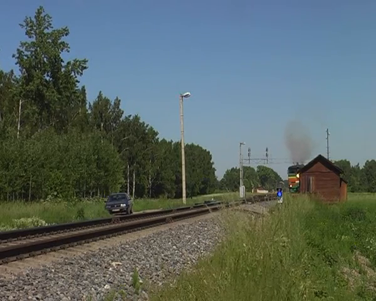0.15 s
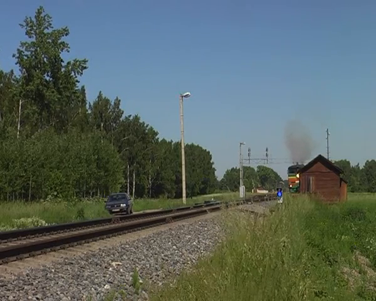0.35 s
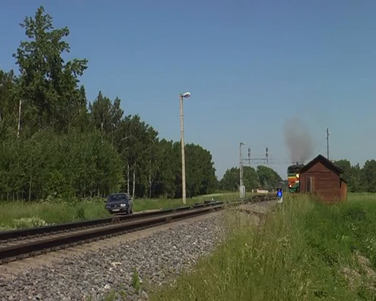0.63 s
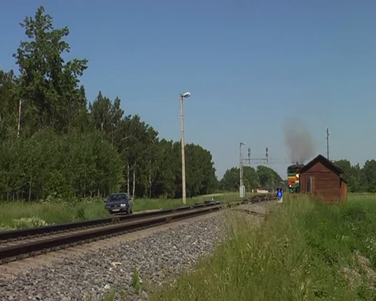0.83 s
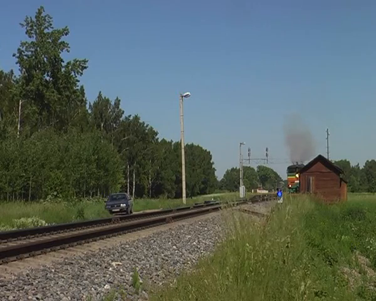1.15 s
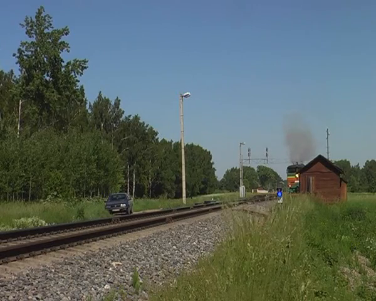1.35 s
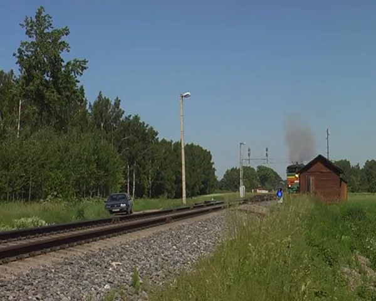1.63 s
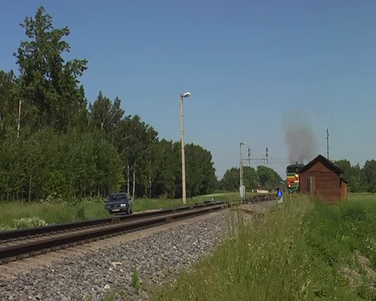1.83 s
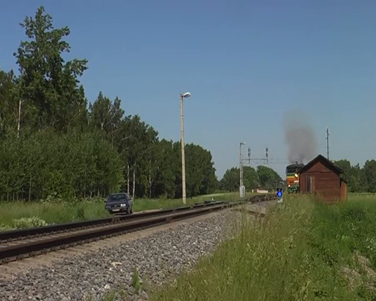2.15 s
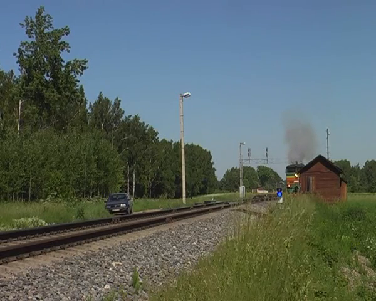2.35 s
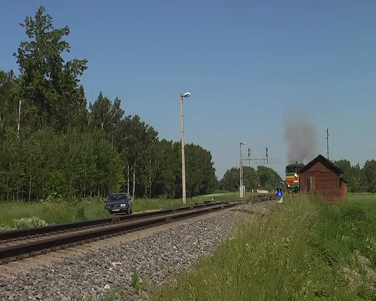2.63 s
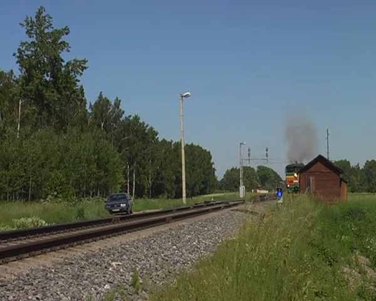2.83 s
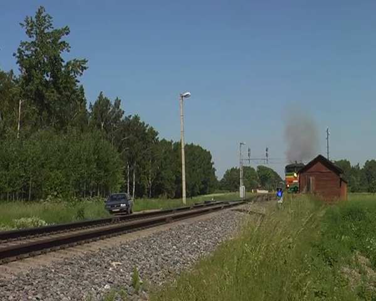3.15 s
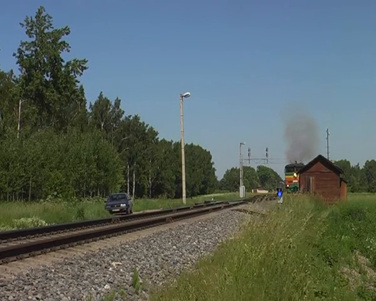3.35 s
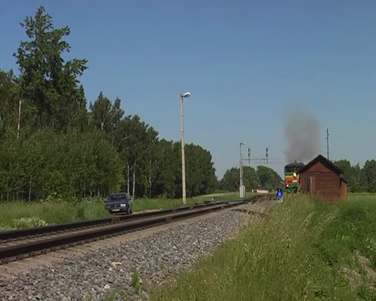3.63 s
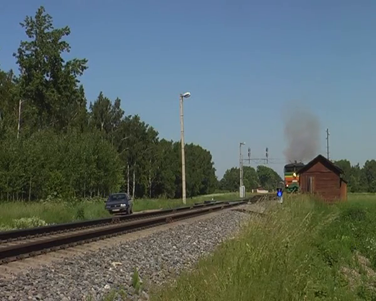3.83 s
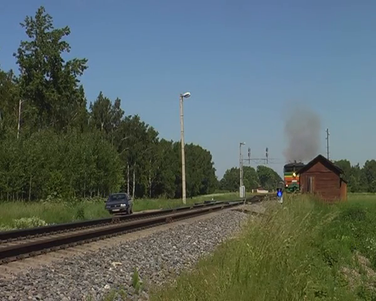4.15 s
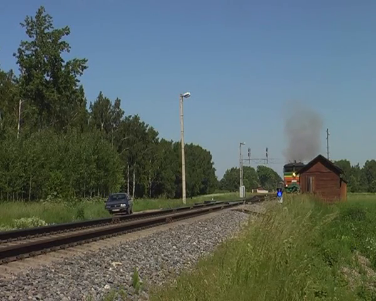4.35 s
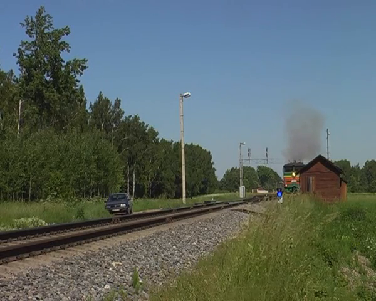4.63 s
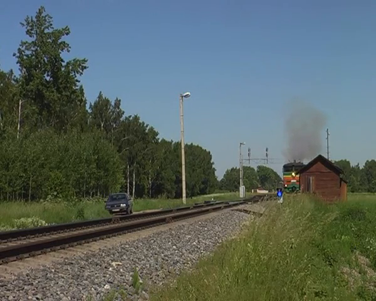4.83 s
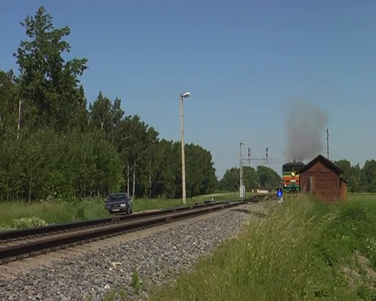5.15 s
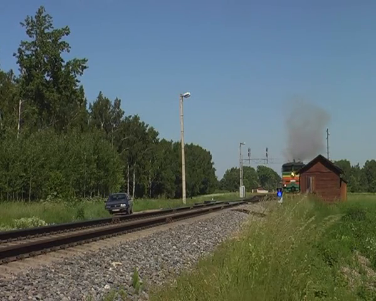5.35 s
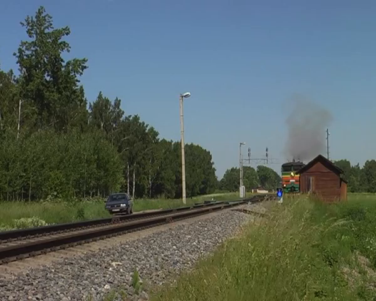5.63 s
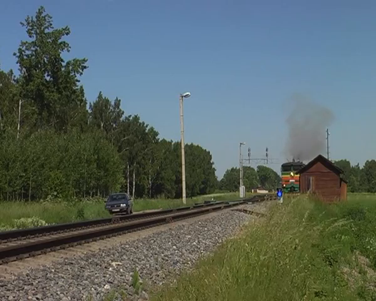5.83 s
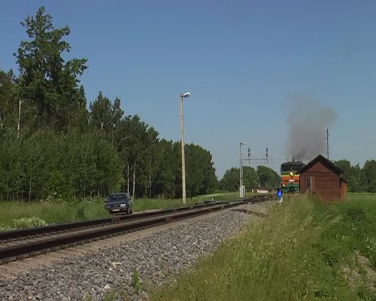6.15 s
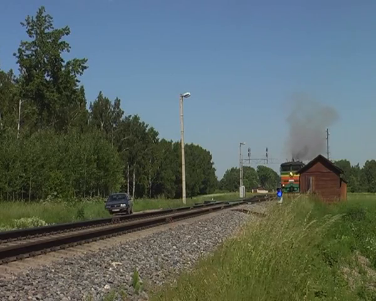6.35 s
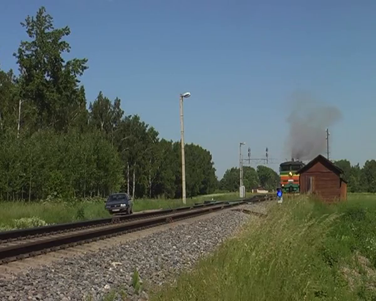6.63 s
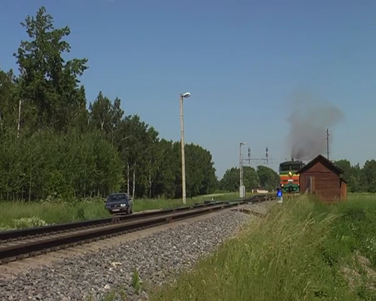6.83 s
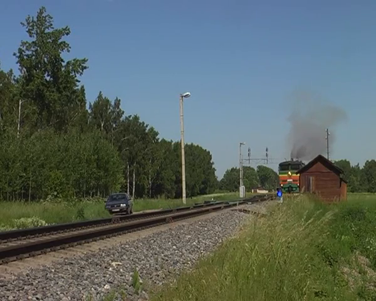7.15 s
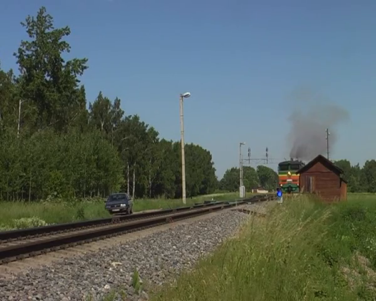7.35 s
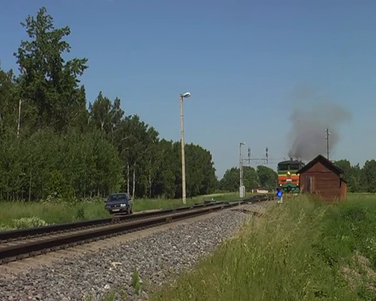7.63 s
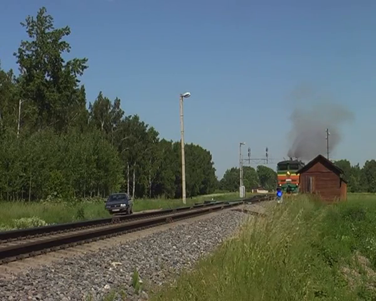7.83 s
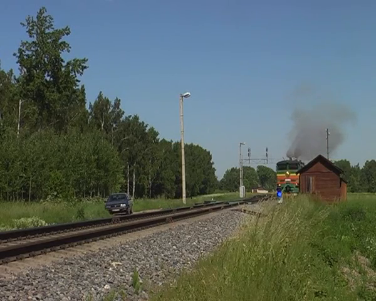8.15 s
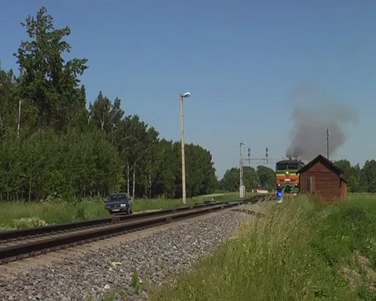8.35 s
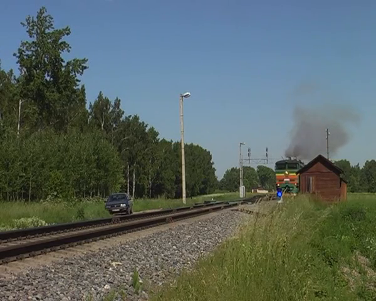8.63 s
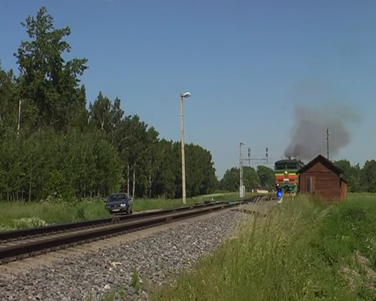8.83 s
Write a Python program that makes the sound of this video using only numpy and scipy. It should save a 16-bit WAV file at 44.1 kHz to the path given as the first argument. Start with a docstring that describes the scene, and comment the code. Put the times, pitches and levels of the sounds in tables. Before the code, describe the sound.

Outdoors beside a rural railway, two heavy diesel engines drone low in the middle distance, their close pitches beating together. Small birds chirp, buzz and trill near the microphone from the start, with thin whistles farther off. The engines gather speed, ease slightly around the middle, then rev up again, growing louder as a turbocharger whine and soft growl climb. Leaves rustle faintly and a few wind gusts bump the microphone late on.

```python
"""Two slow diesel engines haul a nearing train while songbirds call from the first moment on.
Their summed crank multiples drift in speed and beat; gas noise puffs between them, gusts add low lumps.
The front engine slackens around the middle, then both quicken; far birds whistle as gliding sines.
Toward the end a turbocharger whine, wavering sines, and a growl, a narrow noise band, climb and swell."""
import sys
import numpy as np
from scipy import signal
from scipy.io import wavfile
from scipy.ndimage import uniform_filter1d

SR = 44100
rng = np.random.default_rng(int(sys.argv[2]) if len(sys.argv) > 2 else 0)


def generate_wav(signal):
    """Clip the signal to [-1, 1] and save it as 16-bit WAV at the path in sys.argv[1]."""
    frames = np.transpose(np.atleast_2d(signal))
    scaled = np.clip(frames, -1, 1) * 32767
    pcm = np.round(scaled).astype(np.int16)
    wavfile.write(sys.argv[1], SR, pcm)


def natural_amplitude(level_db):
    """Convert a level in decibels to a linear amplitude factor, elementwise."""
    exponent = np.asarray(level_db, float) / 20
    return 10 ** exponent


N = 396900


def evened(x):
    """Scales to rms 1."""
    return x / np.sqrt(np.mean(x ** 2) + 1e-20)


def read(points, hz):
    """Reads a spectrum on a log-frequency axis."""
    f, value = np.transpose(points)
    return np.interp(np.log(hz + 1), np.log(f + 1), value)


def curve(rows, column):
    """One column of a table of curves, sample by sample."""
    rows = np.array(rows)
    return np.interp(np.arange(N) / SR, rows[:, 0], rows[:, column])


def drift(hz):
    """Slow chance up to about hz, rms near 1."""
    steps = rng.standard_normal(int(N / SR * hz * 8) + 16)
    steps = evened(signal.convolve(steps, np.hanning(9), "same"))
    return np.interp(np.arange(N) / SR * hz * 8, np.arange(len(steps)), steps)


def sides(db):
    """Gains of the two channels for a left-over-right difference."""
    return natural_amplitude(np.array([db / 2, -db / 2]))


def place(out, start_s, sound):
    """Adds a sound into the stereo bed at its start."""
    out[:, round(start_s * SR):][:, :sound.shape[-1]] += sound


# left-right likeness of noise, limited to -1..1: (pitch_hz, likeness)
LIKENESS = [(100, 2), (320, 0.9), (560, 0.9), (980, 0.85), (1700, 0.7), (5000, 0.82), (8000, 0.9),
            (12000, 0)]
# left-over-right balance of noise and engine tones: (pitch_hz, balance_db)
BALANCE = [(60, 0.5), (270, -1.2), (1180, -0.77), (5210, -1.7)]


def noise(points, patchy_db):
    """Stereo noise of the given spectrum with drifting patches, rms 1."""
    frames, hz = N // 512 + 5, np.fft.rfftfreq(2048, 1 / SR)
    a, b, c, d, patches = rng.standard_normal((frames, 1025, 5)).T
    patches = uniform_filter1d(patches, size=20, axis=0)
    patches = evened(uniform_filter1d(patches, size=8, axis=1))
    same = np.clip(read(LIKENESS, hz), -1, 1)[:, None]
    left = a + 1j * b
    right = same * left + np.sqrt(1 - same ** 2) * (c + 1j * d)
    outside_db = -60 * ((hz < points[0][0]) | (hz > points[-1][0]))
    level_db = (read(points, hz) + outside_db)[:, None] + patchy_db * patches
    z = np.array([left, right]) * natural_amplitude(level_db) * sides(read(BALANCE, hz))[..., None]
    return evened(signal.istft(z, nperseg=2048, noverlap=1536)[1][:, :N])


def motor():
    """Tape motor: a faint comb of thin tones at multiples of its speed."""
    t = np.arange(N) / SR
    motor_hz, lowest_db = 300, -86
    return sum(natural_amplitude(lowest_db - .8 * (k - 27)) * np.sin(2 * np.pi * k * motor_hz * t + k * k)
               for k in range(27, 49))


# the train nears, gains over time: (time_s, front_db, rear_db, roar_db)
NEARING = [(0, -1.5, -5.5, -1.5), (1.5, -0.5, -7.5, 0), (3, -2, -2, 0.06), (4.5, -1, -6.5, 0.94),
           (6, 0.5, -7, 1.6), (7.5, 0.5, -4, 2), (9, 0, 2, 2)]
# relative spectrum of leaves and field air: (pitch_hz, density_db)
FIELD = [(1700, -2), (2120, 0), (2900, -2.5), (4000, -5), (5200, -10), (6500, -14.5), (8300, -21.5),
         (9000, -21), (9500, -25.5), (15700, -36)]


def field():
    """Rustle of leaves and field air, shaped noise that swells a little more than the roar."""
    return natural_amplitude(-50 + 1.13 * curve(NEARING, column=3)) * noise(FIELD, patchy_db=1.24)


# gusts before their lumpy flutter; half length to 1/e: (peak_s, half_length_s, level_db)
GUSTS = [(1.752, .15, -36), (6.88, 0.099, -26), (7.757, 0.18, -29.5), (8.699, 0.41, -36.5)]


def wind():
    """Lumpy low gusts that push the two microphone ports in opposite ways."""
    t = np.arange(N) / SR
    swell = sum(natural_amplitude(db) * np.exp(-((t - s) / length) ** 2) for s, length, db in GUSTS)
    shape = signal.butter(1, [60, 160], "bandpass", fs=SR)
    push = signal.lfilter(*shape, signal.lfilter(*shape, rng.standard_normal((2, N))))
    push = evened(push - 2.7 * push[::-1])
    return push * swell * natural_amplitude(4.2 * drift(15))


# dry ticks in the grass near the microphone: (start_s, peak_db)
TICKS = [(0.237, -42.5), (4.858, -40.5), (5.223, -44.5), (6.288, -44), (6.922, -45)]


def ticks():
    """Short bright snaps: band-passed noise dying within milliseconds."""
    out, t = np.zeros((2, N)), np.arange(400) / SR
    shape = signal.butter(2, [5000, 10000], "bandpass", fs=SR)
    for start_s, peak_db in TICKS:
        snap = signal.lfilter(*shape, rng.standard_normal(400) * natural_amplitude(-60 * t / .006))
        place(out, start_s, natural_amplitude(peak_db) * snap / abs(snap).max())
    return out


# short high rasps, rms before the ends are rounded: (start_s, length_s, rms_db)
RASPS = [(3.338, .016, -66.5), (7.875, .013, -62), (7.947, .012, -67), (8.052, .026, -62.5),
         (8.084, 0.009, -65)]


def rasps():
    """Brief bursts of high noise, perhaps a grasshopper."""
    out, shape = np.zeros((2, N)), signal.butter(2, [9700, 11100], "bandpass", fs=SR)
    for start_s, length_s, rms_db in RASPS:
        burst = evened(signal.lfilter(*shape, rng.standard_normal(len(along(length_s)))))
        place(out, start_s, natural_amplitude(rms_db) * burst * signal.windows.tukey(len(burst), .4))
    return out


def along(length_s):
    """Share of a note that has passed, 0 to 1."""
    return np.linspace(0, 1, round(length_s * SR))


def ragged(count, size):
    """Smoothed noise that roughens a pitch or level."""
    return uniform_filter1d(rng.standard_normal(count), size=size)


def whistle(hz, db, pan_db, overtone_db=-37, edge=0.34):
    """A near sine on the pitch path hz, with a weak octave, fading and grainy."""
    fade_db, grain_db = -1.5, 2
    turn = 2 * np.pi * np.cumsum(hz) / SR
    note = np.sin(turn) + natural_amplitude(overtone_db) * np.sin(2 * turn)
    note *= signal.windows.tukey(len(hz), edge)
    grain = evened(uniform_filter1d(ragged(len(hz), size=70), size=70))
    level_db = db + fade_db * (np.linspace(0, 1, len(hz)) - .5) + grain_db * grain
    return natural_amplitude(level_db) * sides(pan_db)[:, None] * note


def swept(length_s, db, hz, depth_hz, per_s, hush, pan_db):
    """A note broken into sweeps spanning twice depth_hz, quiet as each sweep resets."""
    beat = (along(length_s) * length_s * per_s) % 1
    hz = hz + 700 * ragged(len(hz), size=30)
    note = whistle(hz + depth_hz * (.5 - 2 * (1 - beat) ** 2), db, pan_db)
    return note * (1 - np.clip(hush, 0, 1) * np.cos(np.pi * beat) ** 2)


# Bird levels are nominal peaks, before fade, grain and pan.
# thin far notes that slide to a knee: (start_s, length_s, level_db, from_hz, knee_hz, to_hz)
FALLS = [(.665, 0.068, -48, 4680, 4430, 3700), (1.704, .11, -55.5, 2450, 3160, 2900),
         (3.832, 0.06, -57, 5900, 5920, 5900), (3.836, 0.17, -56, 6280, 6530, 6200),
         (4.134, 0.091, -58, 6820, 6260, 6300), (4.276, 0.085, -56.5, 7000, 7030, 6300),
         (4.425, .095, -54, 6800, 6280, 5300), (4.6, 0.105, -54.5, 6940, 5800, 4760),
         (4.769, .1, -55, 6770, 5840, 4710), (5.134, 0.066, -47, 4600, 4530, 3850),
         (5.401, 0.041, -47, 4640, 4550, 4560), (5.549, 0.084, -48.5, 4360, 3250, 2930),
         (5.673, 0.059, -51, 3550, 2950, 2900)]


def falls():
    """Far notes on a bent slide; far air makes the level flutter."""
    for start_s, length_s, db, from_hz, knee_hz, to_hz in FALLS:
        u = along(length_s)
        wobble_hz = 70 * evened(ragged(len(u), size=200))
        flutter = natural_amplitude(wobble_hz[::-1] / 25)
        hz = np.interp(u, [0, 0.64, 1], [from_hz, knee_hz, to_hz]) + wobble_hz
        yield start_s, flutter * whistle(hz, db, pan_db=3.0)


# a farther bird repeats one rising whistle: (start_s, level_db)
RISES = [(4.955, -44.5), (5.08, -44), (5.2, -44), (5.322, -45), (5.443, -44.5)]


def rises():
    """A whistle that climbs fast, then levels off."""
    length_s, from_hz, to_hz = .044, 3300, 4700
    for start_s, db in RISES:
        hz = to_hz - (to_hz - from_hz) * (1 - along(length_s)) ** 2.3
        yield start_s, whistle(hz, db, pan_db=-4.5)


# hoarse scratches: (start_s, length_s, level_db, from_hz, to_hz)
SCRATCHES = [(0.187, 0.023, -37, 3390, 4890), (0.207, 0.018, -38.5, 4600, 5400),
             (0.58, 0.022, -37.5, 3540, 4740), (0.597, 0.02, -40.5, 4590, 5200),
             (4.133, .032, -50, 3530, 5720)]


def scratches():
    """A climbing pitch multiplied by low-passed noise, which widens it into a band."""
    for start_s, length_s, db, from_hz, to_hz in SCRATCHES:
        u = along(length_s)
        grit = signal.lfilter(*signal.butter(2, 760, fs=SR), rng.standard_normal(len(u)))
        note = whistle(from_hz + (to_hz - from_hz) * u, db, pan_db=2.5, overtone_db=-26.0, edge=.7)
        yield start_s, note * (.3 + evened(grit))


# slow warbles: (start_s, length_s, level_db, from_hz, to_hz, waves_per_s)
WARBLES = [(7.678, .056, -38, 3420, 2670, 58), (7.795, 0.08, -39, 5360, 5270, 42)]


def warbles():
    """A sliding pitch that waves, with two short sweeps to each wave."""
    for start_s, length_s, db, from_hz, to_hz, per_s in WARBLES:
        u = along(length_s)
        wave = 1 + 0.075 * np.cos(2 * np.pi * per_s * length_s * u - 1.1)
        hz = wave * (from_hz + (to_hz - from_hz) * u)
        yield start_s, swept(length_s, db, hz, 150, 2 * per_s, hush=0.51, pan_db=3.0)


# notes that dip and come back up: (start_s, level_db)
DIPS = [(3.452, -42), (3.475, -40.5), (3.498, -44)]


def dips():
    """A pitch that follows a bowl-shaped curve."""
    length_s, low_hz, top_hz = .017, 3290, 4500
    for start_s, db in DIPS:
        hz = low_hz + (top_hz - low_hz) * (2 * along(length_s) - 1) ** 2
        yield start_s, whistle(hz, db, pan_db=4.0)


# chips, pitches before the opening drop: (start_s, length_s, level_db, base_hz, end_hz)
CHIPS = [(6.89, .017, -38, 4710, 5120), (6.913, 0.018, -32.5, 4720, 5160), (6.935, .03, -34.5, 4500, 3840),
         (7.158, 0.018, -34.5, 3530, 3390), (7.175, 0.022, -37.5, 3160, 2950),
         (7.445, .012, -39, 3700, 3870), (7.463, 0.0086, -37, 3730, 3490)]


def chips():
    """Scratchy notes that drop steeply onto a rising or falling tail."""
    drop_hz, drop_s = 1510, 0.0023
    for start_s, length_s, db, base_hz, end_hz in CHIPS:
        u = along(length_s)
        hz = base_hz + (end_hz - base_hz) * u ** 1.2 + drop_hz * np.exp(-u * length_s / drop_s)
        hz += 900 * ragged(len(u), size=24)
        yield start_s, whistle(hz, db, pan_db=2.5, overtone_db=-35.0, edge=0.39)


# stacked notes: (start_s, level_db, top_hz)
STACKS = [(.137, -43.5, 5350), (.53, -43, 5300)]


def stacks():
    """Three close steady pitches entering one by one from the top."""
    length_s, step_hz, lag_s = 0.012, 465, .004
    for start_s, db, top_hz in STACKS:
        for k in range(3):
            hz = top_hz - k * step_hz + 0 * along(length_s)
            yield start_s + k * lag_s, whistle(hz, db, pan_db=2.0, edge=.8)


# buzzes, pitch before the sweeps: (start_s, length_s, level_db, from_hz, to_hz)
BUZZES = [(0.035, 0.049, -30, 3915, 2770), (3.13, .018, -46, 3550, 3330), (3.289, 0.037, -34, 4880, 4370),
          (3.333, .03, -40.5, 4320, 3800), (3.57, 0.036, -36, 3870, 2750)]


def buzzes():
    """A straight downward slide broken into quick falling sweeps."""
    for start_s, length_s, db, from_hz, to_hz in BUZZES:
        hz = from_hz + (to_hz - from_hz) * along(length_s)
        yield start_s, swept(length_s, db, hz, depth_hz=-220, per_s=250, hush=0.35, pan_db=4.0)


# trills, pitch before the sweeps: (start_s, length_s, level_db, from_hz, to_hz)
TRILLS = [(0.32, 0.054, -29.5, 3940, 3860), (0.426, .05, -32.5, 3190, 3170), (3.863, 0.06, -40, 3930, 3870),
          (3.976, 0.041, -41, 3090, 3270), (4.315, .063, -37, 4610, 4500), (4.433, 0.043, -43, 2960, 3080),
          (7.036, .052, -30.5, 4630, 3950), (7.32, 0.037, -35, 4930, 5100), (7.983, .095, -37, 6000, 2740)]


def trills():
    """A gliding pitch broken into quick rising sweeps."""
    for start_s, length_s, db, from_hz, to_hz in TRILLS:
        hz = to_hz + (from_hz - to_hz) * (1 - along(length_s)) ** 2.1
        yield start_s, swept(length_s, db, hz, depth_hz=325, per_s=98, hush=0.72, pan_db=3.5)


# piped notes of the near songbird: (start_s, length_s, level_db, from_hz, to_hz)
PIPES = [(0.144, 0.018, -39.5, 3250, 3430), (0.153, 0.015, -41, 2870, 2760), (.17, 0.0073, -46, 2400, 2350),
         (.291, 0.011, -41.5, 5950, 5930), (0.299, 0.02, -31.5, 5670, 4360),
         (0.542, 0.024, -42.5, 3260, 3470), (0.548, 0.013, -45, 2750, 2680),
         (0.836, 0.056, -51, 3850, 3450), (1.508, .02, -54, 4400, 4350), (7.607, 0.031, -48, 2400, 2250),
         (8.312, .035, -48, 2100, 2120), (0.956, 0.032, -50, 4690, 4560), (.991, 0.025, -49, 4310, 3980),
         (2.155, 0.1, -51.5, 4560, 4650), (2.447, 0.063, -47, 4280, 4340), (2.688, 0.091, -50, 4320, 4450),
         (2.891, .013, -43.5, 4450, 4670), (2.904, 0.017, -40.5, 4250, 3930),
         (3.009, 0.026, -38, 3420, 3660), (3.04, 0.033, -32.5, 4300, 3730),
         (3.15, 0.025, -32.5, 3330, 3470), (3.173, 0.047, -32.5, 4120, 3590), (3.43, 0.02, -43, 2360, 2560),
         (3.847, 0.028, -47, 5800, 4000), (4.995, 0.022, -47, 3400, 3430), (5.023, 0.053, -42, 3560, 3510),
         (5.271, .027, -49, 3350, 3440), (5.309, 0.022, -42.5, 3700, 3480),
         (5.353, 0.057, -50.5, 3520, 3470), (5.43, .026, -49, 3900, 3290), (5.823, 0.03, -46.5, 5000, 5100),
         (5.852, 0.045, -50, 4800, 4500), (6.729, 0.075, -54, 5880, 5860), (6.873, 0.016, -42, 3800, 4500),
         (7.197, 0.019, -35, 2950, 3390), (7.22, 0.037, -33, 3840, 3730), (7.348, 0.02, -36, 5450, 5900),
         (7.362, 0.015, -41, 5800, 5250), (7.474, 0.033, -36, 3270, 3510),
         (7.515, 0.035, -32.5, 3860, 3780), (7.952, 0.0086, -40, 3900, 5770),
         (7.964, 0.0085, -37, 5730, 5750), (2.93, 0.13, -57, 3700, 4030), (3.676, 0.016, -50, 4400, 4420),
         (0.67, 0.027, -50, 3150, 3050), (6.524, 0.11, -52.5, 3900, 3960)]


def pipes():
    """Clear notes that settle quickly on their last pitch."""
    for start_s, length_s, db, from_hz, to_hz in PIPES:
        hz = to_hz + (from_hz - to_hz) * (1 - along(length_s)) ** 2.5
        yield start_s, whistle(hz, db, pan_db=5.0)


def birds():
    """Songbirds near and far; the wood's edge echoes once, sides swapped, and the trees diffusely."""
    out = np.zeros((2, N))
    for song in (falls, rises, scratches, warbles, dips, chips, stacks, buzzes, trills, pipes):
        for start_s, note in song():
            place(out, start_s, note)
    late = round(0.11 * SR)
    out[:, late:] += natural_amplitude(-21.5) * out[::-1, :-late]
    t = np.arange(SR // 2) / SR
    echo = rng.standard_normal((2, len(t))) * natural_amplitude(-60 * t / 0.45) * (t > .008)
    echo /= np.linalg.norm(echo[0])
    return out + natural_amplitude(-10.0) * signal.fftconvolve(out.mean(0)[None], echo, axes=1)[:, :N]


# gas noise that climbs as load builds: (time_s, pitch_hz, level_db)
GROWL = [(0, 521, -56.5), (4.5, 530.3, -53.5), (6.5, 599.4, -50), (9, 691.6, -49)]


def growl():
    """A climbing sine whose chance level blurs it into a narrow band of noise."""
    tone = np.sin(2 * np.pi * np.cumsum(curve(GROWL, column=1)) / SR + [[0], [.25]])
    return np.sqrt(2) * natural_amplitude(curve(GROWL, column=2)) * tone * drift(65)


# front turbocharger before air blur: (time_s, pitch_hz, rms_db)
WHINE = [(0, 974.2, -58), (1.5, 1092, -56), (4, 1219, -56), (6.5, 1379, -54), (9, 1548, -51.5)]


def whine():
    """Blade tones of both turbochargers, blurred by turbulent air over the long path."""
    out = np.zeros((2, N))
    for ratio, db in [(1, 0), (1.06, -9.5)]:  # the rear one runs a little faster
        hz = ratio * curve(WHINE, column=1) + 17 * drift(40)
        tone = np.sin(2 * np.pi * np.cumsum(hz) / SR + [[0], [.3]])
        out += np.sqrt(2) * natural_amplitude(db + curve(WHINE, column=2) + 3.5 * drift(4)) * tone
    return out


# relative spectrum of exhaust gas and fans: (pitch_hz, density_db)
ROAR = [(35, -26), (45, -12), (70, -12), (100, -4), (220, -5), (280, -9), (390, -12.5), (460, -11.5),
        (530, -8), (700, -9), (1000, -15.5), (1600, -17.5), (1800, -24.5)]


def roar(angle):
    """Gas noise between the tones, puffing slightly in step with the crank."""
    puffs = 1 + 0.09 * np.cos(10 * angle) + 0.1 * np.cos(7 * angle) + 0.026 * np.cos(angle)
    return natural_amplitude(-39.5 + curve(NEARING, column=3)) * noise(ROAR, patchy_db=0.65) * puffs


# crankshaft speeds before smoothing: (time_s, front_turns_per_s, rear_turns_per_s)
SPEED = [(0.0, 7.874, 8.17), (0.6, 8.044, 8.279), (1.2, 8.211, 8.396), (1.8, 8.333, 8.489),
         (2.4, 8.427, 8.574), (3.0, 8.422, 8.612), (3.6, 8.278, 8.561), (4.2, 8.119, 8.491),
         (4.8, 8.072, 8.456), (5.4, 8.156, 8.484), (6.0, 8.302, 8.556), (6.6, 8.48, 8.632),
         (7.2, 8.667, 8.704), (7.8, 8.848, 8.739), (8.4, 8.991, 8.767), (9.0, 9.093, 8.792)]
# exhaust tones before resonance and nearing: (crank_multiple, front_db, rear_db)
ORDERS = [(7, -35, -33.5), (8, -58, -53), (9, -49.5, -53), (10, -31.5, -30), (11, -30.5, -35.5),
          (12, -39, -46), (13, -22.5, -20.5), (14, -24, -32), (15, -45.5, -58.5), (16, -27.5, -28),
          (17, -29, -33), (18, -39, -49.5), (19, -34, -37), (20, -38.5, -56), (21, -44.5, -60.5),
          (22, -48.5, -53), (23, -41.5, -52), (24, -40, -43.5), (25, -40, -61.5), (26, -43, -56.5),
          (27, -40, -49), (28, -47.5, -61), (29, -41.5, -45.5), (30, -46, -49.5), (31, -52, -52.5),
          (32, -49, -47.5), (33, -54.5, -56.5), (34, -55.5, -62), (35, -49, -60.5), (36, -57.5, -67),
          (38, -52.5, -56)]
# geared blower tones, multiples rounded to whole: (crank_multiple, front_db, rear_db)
BLOWER = [(62, -59.5, -46), (66.1, -55, -61.5), (75.15, -56, -60.5)]
# silencer and ground echo lift or cancel fixed pitches: (pitch_hz, width_hz, lift_db)
RESONANCES = [(99.8, 13.9, 2.0), (113.4, 15.7, -15.5), (174.4, 17.5, 6.4), (195.5, 20.0, 5.1),
              (209.7, 20.0, 7.0), (222.7, 20.0, 3.5), (245.6, 20.0, -1.7)]
# puff of each cylinder leaving the stack; sets only the phases of the tones: (turns, level_db)
FIRINGS = [(.092, 5.5), (.161, -3.5), (.302, -1.5), (.423, -6.3), (.499, 4.7), (.648, 2.8), (.685, -3.5),
           (.806, 3.5), (.918, 1.6), (1.02, -1.1)]


def engine(column, lead_turns=0):
    """Ten cylinders fire unevenly once a turn: clean multiples of the crank speed."""
    waver_db = .7
    speed = uniform_filter1d(curve(SPEED, column), size=SR // 3, mode="nearest")
    angle = 2 * np.pi * (np.cumsum(speed) / SR + lead_turns)
    out = np.zeros((2, N))
    for row in ORDERS + BLOWER:
        k = round(row[0])
        hz = k * speed[::64]  # levels move in steps of 64 samples
        db = row[column] + sum(lift / (1 + (2 * (hz - f) / width) ** 2) for f, width, lift in RESONANCES)
        db += waver_db * np.sqrt(k / 16) * drift(0.78)[::64]  # moving air makes high tones waver most
        lag = np.angle(sum(natural_amplitude(d) * np.exp(-2j * np.pi * k * at) for at, d in FIRINGS))
        lag += 4.3 - .0127 * (k - 18) ** 2  # the silencer delays some tones more than others
        lag = lag + .7 * (k / 60) ** 2 * drift(14)  # air blurs the pitch
        tone = np.cos(k * angle + lag + [[0], [.15]])  # the right port hears the train first
        tone *= sides(read(BALANCE, hz.mean()))[:, None]
        out += np.sqrt(2) * np.repeat(natural_amplitude(db), 64)[:N] * tone
    return out * natural_amplitude(curve(NEARING, column)), angle


def scene():
    """Both engines, their roar and whine, and the field around."""
    front, angle = engine(column=1)
    rear = engine(column=2, lead_turns=1 / 3)[0]  # the lead places the beats
    background = motor() + field() + wind() + ticks() + rasps() + birds()
    return background + growl() + whine() + roar(angle) + rear + front


def roll_off(x):
    """The treble ends steeply here."""
    return signal.sosfilt(signal.butter(12, 15720, fs=SR, output="sos"), x)


def record(dry):
    """Hands over the finished mix."""
    return roll_off(dry)


dry = scene()
out = record(dry)
generate_wav(out)
```